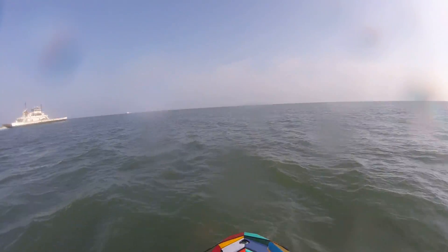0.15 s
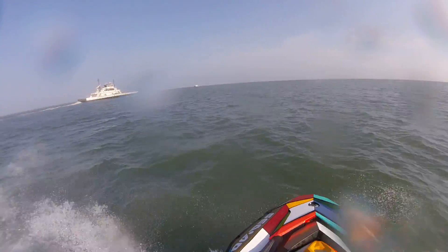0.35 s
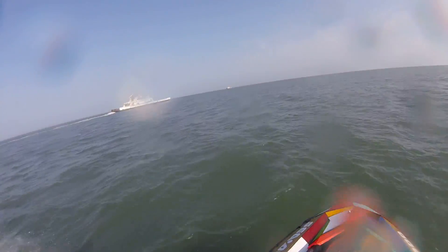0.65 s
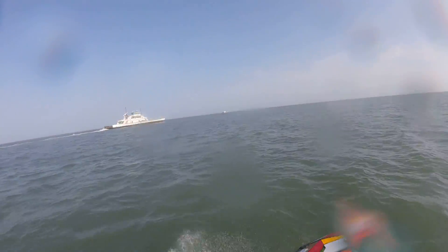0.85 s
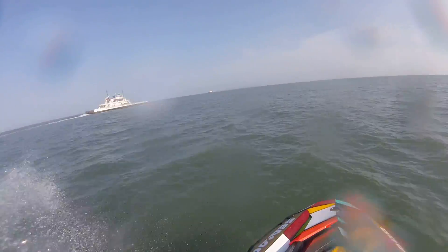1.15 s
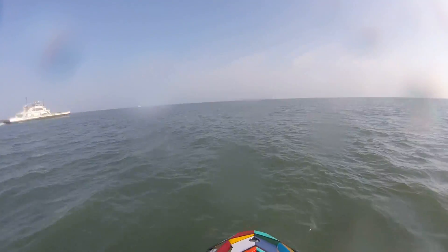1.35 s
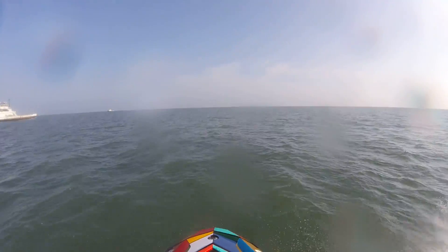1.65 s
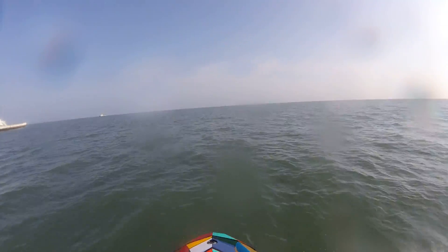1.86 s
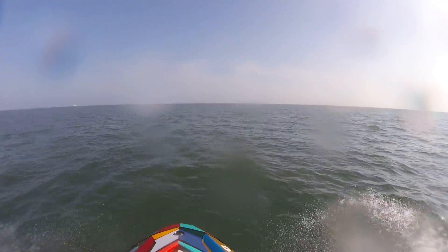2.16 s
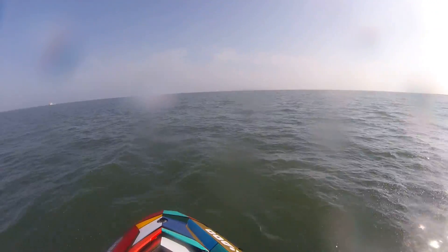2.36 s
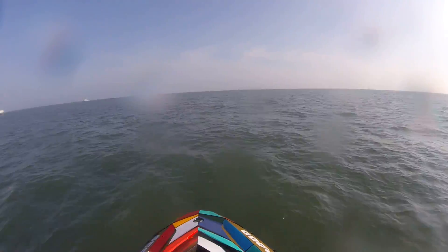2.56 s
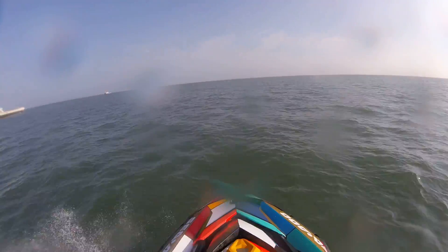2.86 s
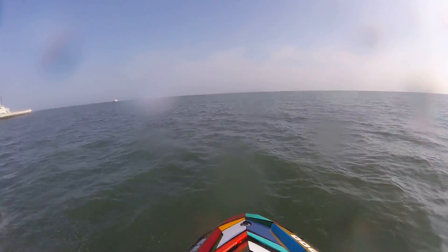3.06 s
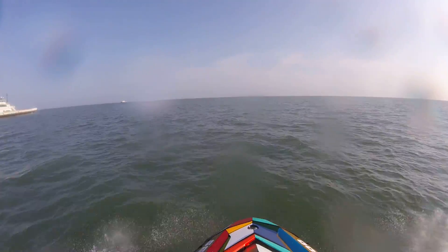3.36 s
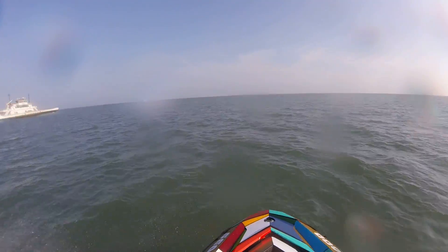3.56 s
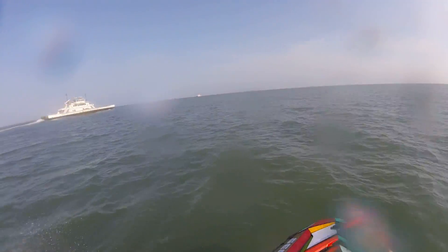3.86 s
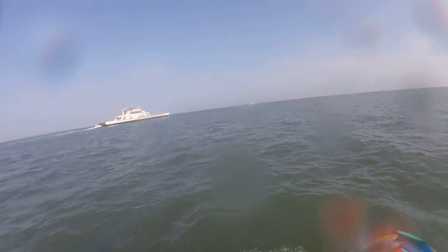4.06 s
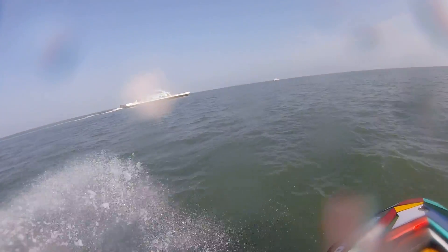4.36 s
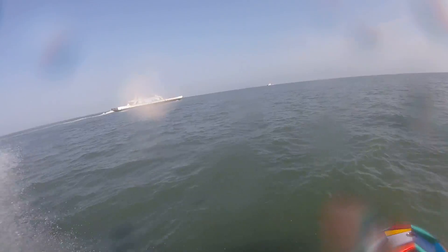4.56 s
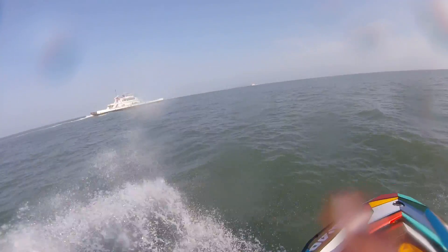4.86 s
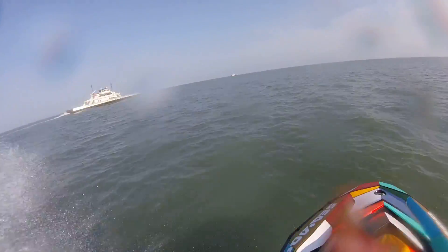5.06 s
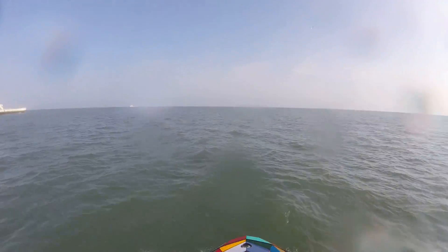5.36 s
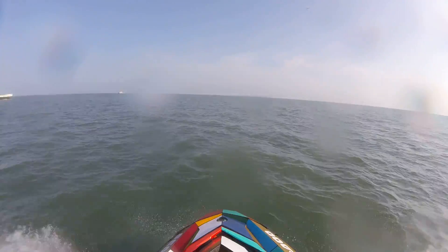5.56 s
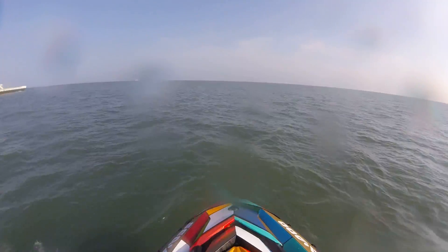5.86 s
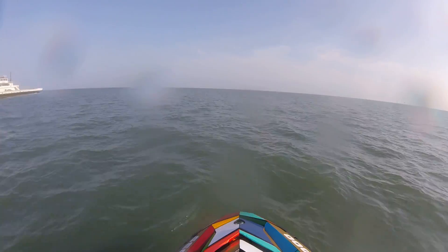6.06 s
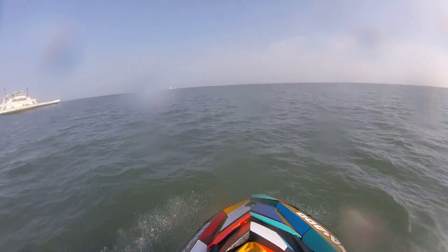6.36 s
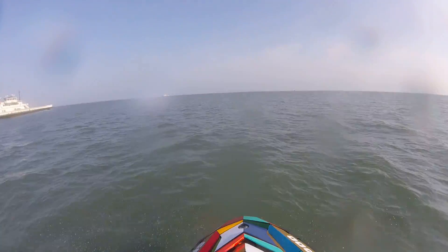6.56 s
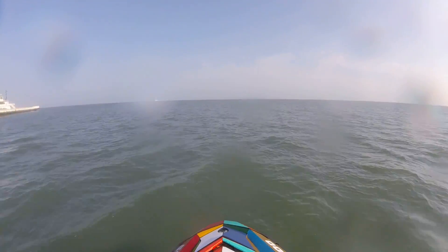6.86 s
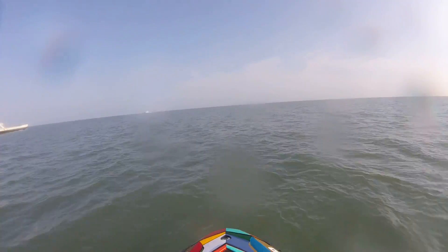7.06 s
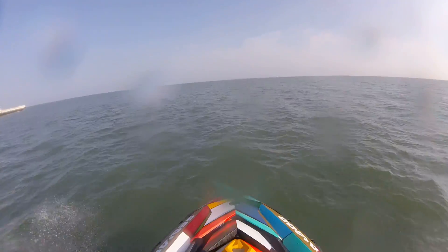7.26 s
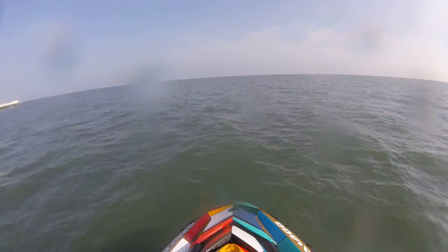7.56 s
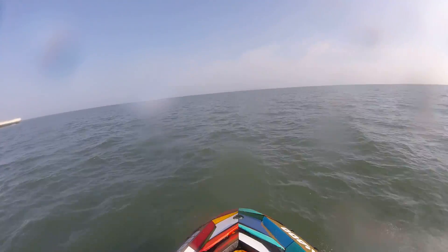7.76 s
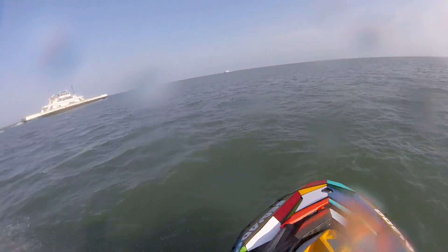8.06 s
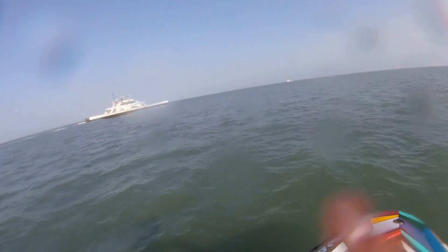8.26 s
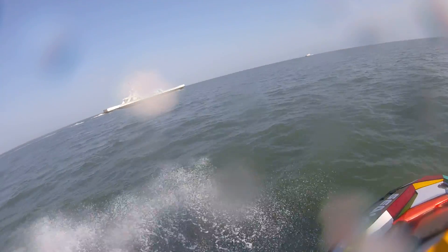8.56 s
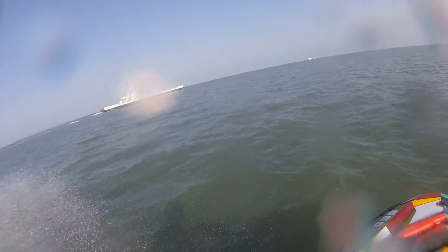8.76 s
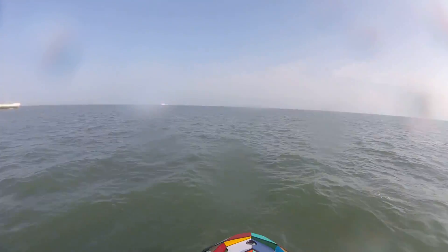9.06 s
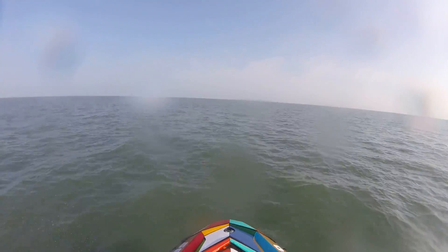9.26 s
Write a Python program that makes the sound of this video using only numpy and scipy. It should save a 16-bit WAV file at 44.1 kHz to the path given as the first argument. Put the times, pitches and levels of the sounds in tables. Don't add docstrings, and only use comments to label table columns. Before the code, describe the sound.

Steady buzzing watercraft motor with a throttle surge near the middle, water rumbling and splashing under the hull, wind thumping the microphone.

```python
import sys
import numpy as np
from scipy import signal
from scipy.fft import rfft, irfft, next_fast_len
from scipy.io import wavfile
from scipy.ndimage import uniform_filter1d

SR = 44100
rng = np.random.default_rng(int(sys.argv[2]) if len(sys.argv) > 2 else 0)


def amplitude_ratio(level_db):
    exponent = np.asarray(level_db, float) / 20
    return 10 ** exponent


def transcribe(u):
    v = np.clip(np.atleast_2d(u).T, -1, 1)
    q = np.round(v * 32767).astype(np.int16)
    wavfile.write(sys.argv[1], SR, q)


N = 415422

# time in seconds, cycle rate in Hz, crank order level in dB, firing order level in dB.
RUNNING = [(0.0, 41.92, -32, -30), (0.39, 41.9, -37, -26.5), (0.52, 43.77, -33, -24.5),
           (0.75, 44.48, -29.5, -30), (1.4, 44.63, -32, -31), (1.62, 42.37, -28, -34),
           (2.0, 43.3, -33.5, -32.5), (3.3, 43.25, -30, -29), (4.05, 42.9, -33.5, -31.5),
           (4.77, 43.25, -24.5, -19.5), (5.04, 45.31, -24, -25.5), (5.85, 45.63, -22, -27),
           (6.45, 47.65, -22, -28.5), (6.72, 49.22, -24, -22.5), (7.6, 50.35, -24.5, -21.5),
           (7.95, 49.2, -21.5, -23.5), (8.6, 47.76, -20, -26), (9.42, 47.7, -26.5, -26)]
# time in seconds, loss in Hz, half length in seconds.
SAGS = [(2.28, 0.89, .1), (2.85, 0.15, 0.097), (3.62, .7, .15), (4.33, 0.5, 0.14), (5.27, -0.28, 0.059),
        (5.6, 0.39, 0.087), (6.16, -.4, 0.097), (6.43, 0.91, 0.081), (7.16, 0.88, 0.16),
        (7.79, -0.46, 0.074), (8.16, -.3, .08), (8.9, -0.28, .12)]
# time in seconds, rise in dB, half length in seconds.
BITES = [(.13, 13, 0.11), (.4, 15.5, .06), (.76, 12.5, 0.068), (1.03, -4, .05), (1.37, 14, 0.059),
         (1.7, 3, .06), (2.28, 14, 0.058), (2.65, -1, 0.048), (3.17, 7, .07), (3.47, 3, 0.044),
         (4.0, 1, 0.051), (4.33, 3, 0.051), (4.64, 12, 0.071), (4.92, 5.5, .05), (5.27, 10.5, 0.1),
         (5.62, 3, .04), (5.95, 6, .07), (6.3, 5.5, 0.058), (6.58, 6, .04), (7.22, 5.5, 0.041),
         (8.17, 5, 0.059), (9.33, 5, 0.047)]
# time in seconds, loss in dB, half length in seconds.
SLIPS = [(.67, 3, .03), (1.47, 4, 0.043), (1.98, 11.5, 0.084), (2.4, 4, .04), (2.85, 1, 0.064),
         (3.62, -3, .06), (4.7, 13, 0.038), (5.2, 5.5, 0.078), (6.15, -2, 0.032), (6.55, 6, 0.047),
         (7.2, 4, 0.029), (8.2, 6.5, 0.028), (8.45, 14, 0.044), (9.17, 10, 0.058)]
# multiple of cycle rate, dB re smoothed crank order, extra dB at open throttle.
LOAD_ORDERS = [(1, -12, 0.0027), (4, -10.5, 0)]
# multiple of cycle rate, dB re smoothed fifth, extra dB at open throttle.
STEADY_ORDERS = [(6, -8.5, -1.5), (7, -23, 2), (8, -15.5, 6.5), (9, -19, 7.5), (11, -19.5, -7.5),
                 (12, -19, -1), (13, -32, 9), (14, -28, 0.5), (15, -25.5, 3), (16, -27.5, 1.5),
                 (17, -38.5, 9)]
# centre in Hz, width in Hz, lift in dB.
PANELS = [(258.6, 12, 6), (459, 17.5, 2.5), (598, 21, 4), (662, 20, 8.5)]
# time in seconds, level in dB.
THROW = [(0.0, -44.5), (0.6, -45), (1.5, -47), (1.62, -49.5), (1.9, -50.5), (2.1, -45), (2.55, -46),
         (2.72, -42.5), (3.3, -44), (3.67, -47.5), (4.15, -40.5), (4.5, -42), (5.3, -44), (6.1, -43),
         (6.52, -46), (7.2, -43.5), (8.2, -47), (9.42, -45)]
# crest in seconds, rise in dB, half length in seconds.
SPLASHES = [(.35, 6.5, 0.051), (.79, 5.5, 0.011), (.98, 3, .04), (1.43, 4, 0.049), (2.12, 0, 0.036),
            (3.42, 2.5, .04), (4.28, 1, 0.063), (4.8, 7.5, .07), (5.5, 8.5, 0.059), (5.72, 2, .09),
            (8.75, 1.5, 0.06), (.2, 3.5, 0.046), (6.22, 4.5, 0.062), (6.4, 1.5, 0.02), (7.12, 1.5, 0.049),
            (7.24, 0.5, 0.034), (7.78, 4, 0.024), (8.49, 8.5, 0.065)]
# frequency in Hz, density in dB per Hz.
SPRAY = [(1800, -9), (3000, -7.5), (4200, -6.5), (5000, -3), (6000, -5.5), (7200, -9.5), (8500, -12),
         (9700, -18), (10300, -24.5), (11600, -25.5), (12200, -42), (12900, -58)]
# frequency in Hz, density in dB per Hz.
WASH = [(400, -7), (800, -1.5), (1200, -5), (1800, -9), (2600, -13), (3600, -18), (4500, -38)]
# frequency in Hz, density in dB per Hz.
RUMBLE = [(40, -6.5), (80, 0.5), (150, -2), (250, -5.5), (320, -7.5), (420, -9), (550, -16), (700, -17),
          (1000, -26), (1500, -37)]
# time in seconds, rise in dB, half length in seconds.
ROLLERS = [(.34, 3, 0.05), (.9, 3, 0.089), (1.4, 1, 0.12), (2.15, 1, 0.077), (3.04, 2.5, 0.045),
           (3.28, 5, 0.079), (3.49, 1, 0.043), (3.96, 2, 0.049), (4.35, 0, 0.049), (4.75, 2, 0.12),
           (5.11, 0, 0.052), (5.4, 4, .1), (6.0, 1.5, .1), (7.15, 3.5, 0.099), (7.7, 2, 0.077),
           (8.26, 2, 0.048), (8.7, 0, 0.099)]
# start in seconds, peak in dB, ring in Hz.
KNOCKS = [
    (0.339, -17, 480),
    (2.237, -19.5, 635.5),
    (3.159, -21.5, 638),
    (3.767, -23, 509),
    (4.651, -13.5, 648),
    (5.539, -22, 482),
    (5.991, -29, 695),
    (6.306, -15, 612),
    (7.825, -17, 497),
    (8.957, -20, 597),
]
# time in seconds, tick peak in dB, bright edge in dB.
DROPS = [
    (0.781, -28, -61),
    (1.5444, -28, -56),
    (4.6464, -28, -54),
    (5.0095, -16, -59),
    (7.7694, -34, -64),
    (8.2152, -36, -71),
]
# time in seconds, level in dB.
BREEZE = [
    (0.0, -23),
    (0.9, -22),
    (2.0, -31),
    (4.5, -33.5),
    (5.4, -25.5),
    (7.0, -22.5),
    (8.6, -29.5),
    (9.42, -21),
]
# frequency in Hz, density in dB per Hz.
WIND = [(12, -13), (20, 1), (40, -1.5), (70, -2.5), (120, -8), (200, -9.5), (320, -23)]

THROTTLE_HZ, DROWN_HZ = 44.93, 46.4
FIRING_THROB, FIFTH_FOLLOWS = 0.17, 0.3
FIFTH_DB, FIFTH_OPEN_DB = -27.5, 1.5
TENTH_DB, TENTH_OPEN_DB = -37.5, 1.3
INTAKE_HZ, INTAKE_WIDTH_HZ, INTAKE_DB = 476.5, 8.9, -9
PORT_HZ, PORT_WIDTH_HZ, PORT_DB = 6480, 400, 7
CALM_DB = -45
WASH_DB, WASH_FOLLOWS, WASH_OPEN_DB = -42.5, 0.57, 2.5
RUMBLE_DB, RUMBLE_FOLLOWS, RUMBLE_OPEN_DB, RUMBLE_LUMPS_DB = -27.5, 0.2, 2, 0.87


def rms_one(x):
    return x / np.sqrt(np.mean(x ** 2) + 1e-20)


def in_time(rows):
    s, *columns = np.transpose(rows)
    return [np.interp(np.arange(N) / SR, s, column) for column in columns]


def swells(events, tail=1):
    t = np.arange(0, N, 50) / SR
    s, height, half_s = np.transpose(events)[..., None]
    side_s = half_s * np.where(t > s, tail, 1)
    bells = height * np.exp(-((t - s) / side_s) ** 2)
    return np.interp(np.arange(N) / SR, t, bells.sum(axis=0))


def drift(rate_hz):
    r = np.exp(-80 * np.pi * rate_hz / SR)
    white = rng.standard_normal(N // 40 + 2002)
    slow = signal.lfilter([1], [1, -2 * r, r * r], white)[2000:]
    return np.interp(np.arange(N) / 40, np.arange(len(slow)), rms_one(slow - slow.mean()))


def resonate(x, hz, width_hz):
    r = np.exp(-np.pi * width_hz / SR)
    zeros = np.array([1, 0, -1]) * (1 - r * r) / 2
    return signal.lfilter(zeros, [1, -2 * r * np.cos(2 * np.pi * hz / SR), r * r], x)


def coloured(white, spectrum):
    size = next_fast_len(N)
    hz = np.maximum(np.arange(size // 2 + 1) * SR / size, 1)
    at_hz, db = np.transpose(spectrum)
    gain = amplitude_ratio(np.interp(np.log(hz), np.log(at_hz), db, left=-90, right=-90))
    return rms_one(irfft(rfft(white, size) * gain, size)[:N])


def near(hz, centre_hz, width_hz):
    return 1 / (1 + ((hz - centre_hz) / width_hz) ** 2)


def engine(wobble_db=1.2, wander_rad=0.12):
    cycle_hz, load_db, exhaust_db = in_time(RUNNING)
    cycle_hz = cycle_hz - swells(SAGS)
    phase = 2 * np.pi * np.cumsum(cycle_hz) / SR
    throttle = (1 + np.tanh((cycle_hz - THROTTLE_HZ) / 0.31)) / 2
    throb_db, falter_db = swells(BITES), swells(SLIPS)

    crank_db = load_db + throb_db
    firing_db = exhaust_db + FIRING_THROB * throb_db - falter_db
    fifth_db = FIFTH_DB + FIFTH_OPEN_DB * throttle - 0.83 * falter_db
    fifth_db = fifth_db + FIFTH_FOLLOWS * (exhaust_db - exhaust_db.mean())
    tenth_db = TENTH_DB + TENTH_OPEN_DB * throttle - 0.73 * falter_db
    tenth_db = tenth_db + INTAKE_DB * near(10 * cycle_hz, INTAKE_HZ, INTAKE_WIDTH_HZ)
    orders = [(2, crank_db), (3, firing_db), (5, fifth_db), (10, tenth_db)]

    drown_db = 1.3 * np.maximum(cycle_hz - DROWN_HZ, 0)
    for table, lead_db in ((LOAD_ORDERS, crank_db), (STEADY_ORDERS, fifth_db)):
        base_db = uniform_filter1d(lead_db, size=SR // 2)
        for k, db, open_db in table:
            k = round(k)
            lift_db = sum(top_db * near(k * cycle_hz, hz, width_hz) for hz, width_hz, top_db in PANELS)
            level_db = base_db + db + open_db * throttle + lift_db - drown_db * (k > 10)
            orders.append((k, level_db + (1.011 + 0.13 * k) * drift(3.05)))

    out = 0
    for k, db in orders:
        start = 2 * np.pi * rng.random()
        sway = (wander_rad + 0.016 * k) * drift(3.8)
        level = amplitude_ratio(db + wobble_db * drift(7.3)) * np.sqrt(2)
        out = out + level * np.sin(k * phase + start + sway)
    return out, phase, throttle


def rumble(db, phase):
    pulse = 1 + 0.26 * np.cos(phase)
    return amplitude_ratio(db) * coloured(pulse * rng.standard_normal(N), RUMBLE)


def splashing(wash_db, spray_db):
    gusts_db = 0.41 * drift(19) + 0.47 * drift(38)
    sizes = amplitude_ratio(4.0 * np.minimum(rng.exponential(1, N), 5)) * rng.choice([-1, 1], N)
    droplets = rms_one(sizes * (rng.random(N) < 2500 / SR))
    wash = coloured(rng.standard_normal(N), WASH)
    spray = coloured(rng.standard_normal(N) + 0.34 * droplets, SPRAY)
    spray = rms_one(spray + amplitude_ratio(PORT_DB) * resonate(spray, PORT_HZ, PORT_WIDTH_HZ))
    top = signal.sosfilt(signal.butter(2, 8500, "high", fs=SR, output="sos"), spray)
    spray = spray + (amplitude_ratio(0.25 * (spray_db + 43.5)) - 1) * top
    return amplitude_ratio(wash_db + 0.81 * gusts_db) * wash + amplitude_ratio(spray_db + gusts_db) * spray


def knocks():
    out = np.zeros(N)
    after_s = np.arange(round(0.06 * SR)) / SR
    for s, db, hz in KNOCKS:
        at = round(s * SR)
        ring = np.exp(-after_s / 0.0075) * np.sin(2 * np.pi * hz * after_s)
        out[at:at + len(after_s)] += amplitude_ratio(db - 2.5) * ring
    return out


def clicks(events, column):
    out = np.full(N, 1e-18)
    for row in events:
        out[round(row[0] * SR)] = amplitude_ratio(row[column])
    return out


def drops():
    tick_band = signal.butter(4, [1500, 8000], "band", fs=SR, output="sos")
    edge_band = signal.butter(2, [9000, 13000], "band", fs=SR, output="sos")
    ticks = signal.sosfilt(tick_band, clicks(DROPS, 1))
    edge = signal.sosfilt(edge_band, clicks(DROPS, 2))
    return amplitude_ratio(4) * ticks + amplitude_ratio(9) * edge + amplitude_ratio(18) * resonate(ticks, PORT_HZ, PORT_WIDTH_HZ)


def wind(db):
    return amplitude_ratio(db + 1.14 * drift(8.4)) * coloured(rng.standard_normal(N), WIND)


def scene():
    drone, phase, throttle = engine()
    spray_db = in_time(THROW)[0] + swells(SPLASHES, tail=2.2)
    excess_db = spray_db - CALM_DB
    wash_db = WASH_DB + WASH_FOLLOWS * excess_db + WASH_OPEN_DB * throttle
    rumble_db = RUMBLE_DB + RUMBLE_FOLLOWS * excess_db + RUMBLE_OPEN_DB * throttle
    rumble_db = rumble_db + swells(ROLLERS) + RUMBLE_LUMPS_DB * drift(9.9)
    wind_db = in_time(BREEZE)[0] + swells(GUSTS)
    water = rumble(rumble_db, phase) + splashing(wash_db, spray_db) + knocks() + drops()
    mix = drone + water + wind(wind_db)
    return mix[None]


# time in seconds, rise in dB, half length in seconds.
GUSTS = [(.05, 2.5, 0.019), (.32, 4, 0.026), (.5, 8, 0.049), (.68, 7.5, 0.054), (.85, 5.5, 0.034),
         (1.0, 4.5, 0.062), (1.31, 6.5, 0.036), (1.53, 9.5, .04), (1.63, 11.5, 0.048), (1.85, 11, 0.055),
         (2.15, 7, .05), (2.45, 13.5, 0.045), (2.68, 13.5, 0.067), (2.96, 11, 0.057), (3.25, 13, 0.046),
         (3.4, 18, 0.028), (4.02, 14.5, 0.11), (4.33, 15, 0.041), (4.7, 9, 0.081), (5.19, 8, .04),
         (5.39, 13, 0.052), (6.06, 8, 0.032), (6.42, 3.5, 0.1), (7.1, 6, 0.093), (7.37, 3, .04),
         (7.72, 2.5, .07), (8.26, 15.5, 0.049), (8.55, 3, .04), (8.82, 6.5, 0.067), (9.3, 2, .05)]


def band_limit(x):
    return signal.sosfilt(signal.butter(12, 12870, fs=SR, output="sos"), x)


def record(dry):
    top = 0.87
    return band_limit(top * np.tanh(dry / top))


dry = scene()
out = record(dry)
transcribe(out)
```